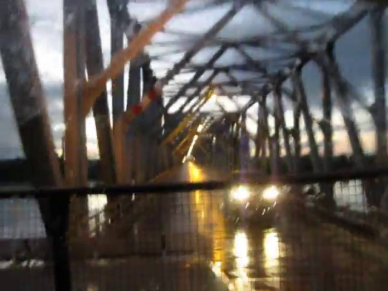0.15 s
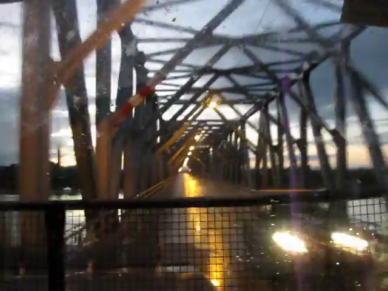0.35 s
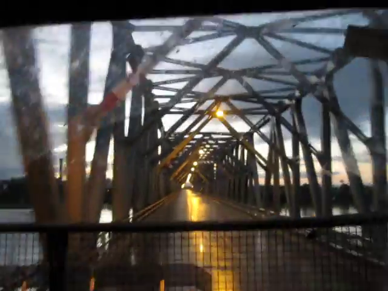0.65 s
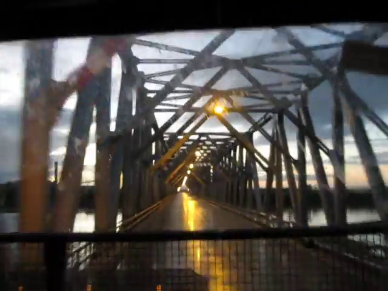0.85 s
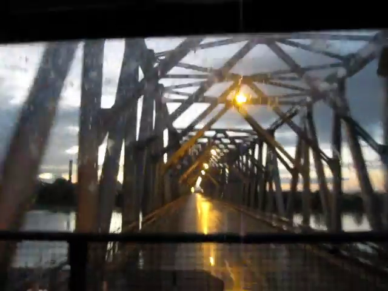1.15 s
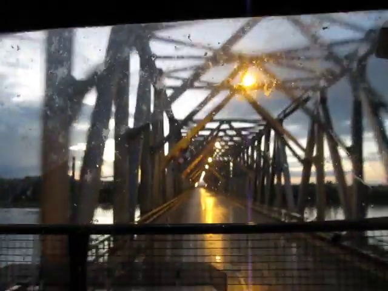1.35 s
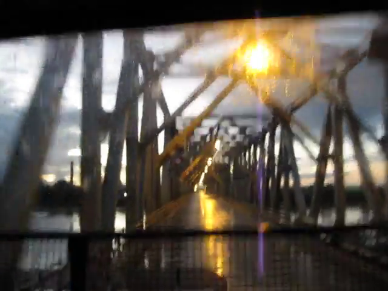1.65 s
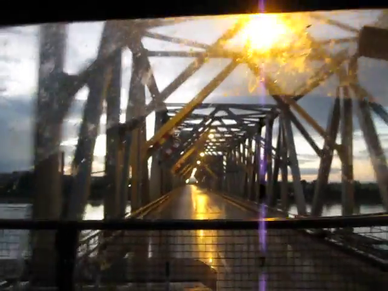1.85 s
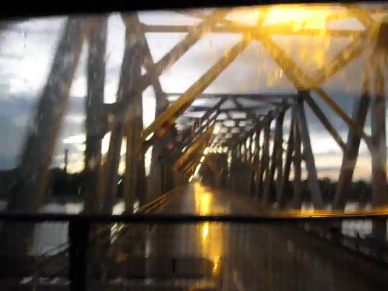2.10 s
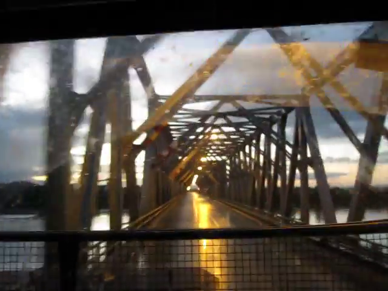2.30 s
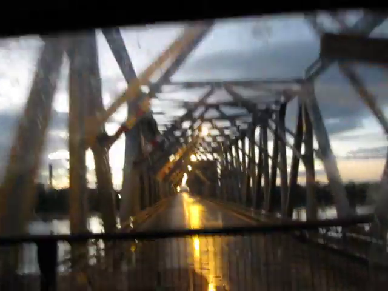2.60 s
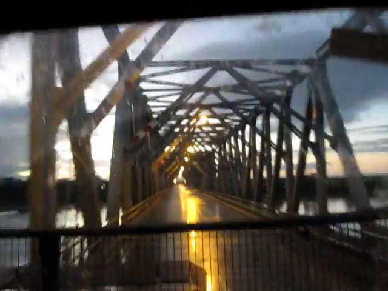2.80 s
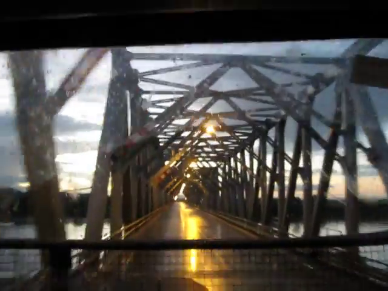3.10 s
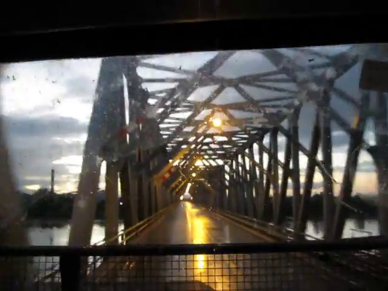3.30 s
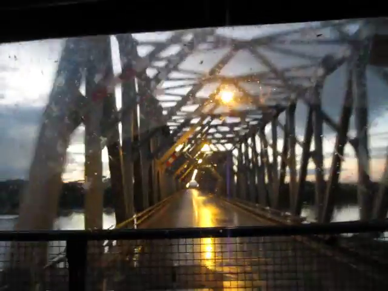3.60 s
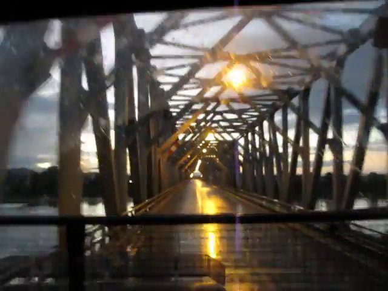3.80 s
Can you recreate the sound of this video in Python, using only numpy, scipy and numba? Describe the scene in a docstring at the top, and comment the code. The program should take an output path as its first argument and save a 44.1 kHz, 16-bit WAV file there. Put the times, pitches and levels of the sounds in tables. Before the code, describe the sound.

Steady diesel drone with clatter and a thin whine fills a moving truck cab. A wet car pass comes first, then a hard thud midway and denser rattles and squeaks near the end, captured inside with narrow bandwidth.

```python
"""The diesel drones and slowly gains speed, heard inside a truck cab driving along a wet road: sines at
multiples of the firing rate, with clatter and intake whistle as noise pulsed by each firing. The drivetrain
whines, bumps ring the panels as decaying sines, and the trim chirps with short gliding tones. An oncoming car
swishes by in gliding bands of noise; shaped noise makes the road rumble and the cab boom.
The recorder's limiter ducks around the hardest knocks."""
import sys
import numpy as np
from scipy import signal
from scipy.fft import rfft, irfft, next_fast_len
from scipy.io import wavfile
from scipy.ndimage import uniform_filter1d
from numba import njit

SR = 44100
rng = np.random.default_rng(int(sys.argv[2]) if len(sys.argv) > 2 else 0)


def wav_record(signal):
    """Record a signal, one row per channel, as 16-bit PCM in the file named by sys.argv[1]."""
    frames = np.transpose(np.atleast_2d(signal))
    bounded = np.clip(frames, -1, 1)
    # unit amplitude maps onto the largest positive 16-bit level
    quanta = np.round(bounded * 32767).astype(np.int16)
    wavfile.write(sys.argv[1], SR, quanta)


N = 174195

# spectrum of the loose fittings: (frequency [Hz], relative level per Hz [dB])
RATTLE_SPECTRUM = [(300, -9), (900, -1.5), (1300, -7), (2100, 3), (3000, -1), (4000, -0.5), (5200, -8.5),
                   (6500, -16)]


def undb(db):
    """Decibels to gain."""
    return 10 ** (np.asarray(db) / 20)


def unit(x):
    """Scale to rms 1."""
    return x / np.sqrt(np.mean(x ** 2) + 1e-20)


def clock():
    """Time of each sample, in seconds."""
    return np.arange(N) / SR


def curve(rows):
    """Join (time [s], value) rows by straight lines."""
    return np.interp(clock(), *np.array(rows, float).T)


def noise(gain):
    """Noise of rms 1 whose spectrum is gain(Hz)."""
    size = next_fast_len(N)
    hz = np.maximum(np.arange(size // 2 + 1) * SR / size, 1)
    spectrum = rfft(rng.standard_normal(size)) * gain(hz)
    return unit(irfft(spectrum, size)[:N])


def resonance(hz, width_hz):
    """Noise in a resonance; width_hz spans its half-amplitude points."""
    return noise(lambda f: 1 / (1 + ((f ** 2 - hz ** 2) / (f * width_hz)) ** 2))


def colour(points, f):
    """Gain at f of a (frequency [Hz], level [dB]) spectrum, joined over log frequency."""
    hz, db = np.array(points, float).T
    return undb(np.interp(np.log(f), np.log(hz), db))


def walk(rate):
    """Smooth random drift of rms 1, moving about rate times a second."""
    step = max(int(SR / rate), 1)
    held = np.repeat(rng.standard_normal(N // step + 2), step)
    held = held[rng.integers(step):][:N]
    return unit(uniform_filter1d(uniform_filter1d(held, step), step))


def steady(x, span_s):
    """Even out swells longer than span_s."""
    span = max(int(span_s * SR), 1)
    return x / np.sqrt(uniform_filter1d(x ** 2, span) + 1e-9)


def tone(hz):
    """Sine of rms 1 that follows a pitch curve from a random phase."""
    return np.sqrt(2) * np.sin(2 * np.pi * (np.cumsum(hz) / SR + rng.random()))


def engine():
    """One wandering firing rate drives the drone, the hum and everything that pulses at each firing."""
    # engine speed: (time [s], firing rate before jitter [Hz])
    firing_hz = [(0, 58.3), (1.0, 58.35), (1.8, 58.55), (2.4, 58.9), (3.1, 59.5), (3.95, 60.1)]
    speed_jitter = .0015
    hz = curve(firing_hz) * (1 + speed_jitter * walk(8))
    cycle = np.cumsum(hz) / SR % 1  # 0 to 1 from one firing to the next
    return drone(hz) + hum(hz) + clatter(cycle) + whistle(cycle)


def rough_order(multiple, hz):
    """A sine at a multiple of the firing rate, its level wavering and roughened."""
    waver_db, rough_db = 1.5, 1.5
    level = undb(waver_db * walk(9) + rough_db * walk(35))
    return steady(level * tone(multiple * hz), .3)


def drone(hz):
    """Engine orders sum to the drone; each shifts level as the throttle eases."""
    # multiples of the firing rate [ratio]; the lowest is a shaft that throbs against the firings
    multiples = [.82, 1, 3, 5, 9, 10, 11, 12, 14]
    # level of each multiple: (under load [dB], throttle eased [dB])
    multiple_levels = [(-35, -36), (-30.5, -31.5), (-32.5, -37.5), (-46.5, -38), (-41, -41.5), (-41, -40.5),
                       (-38.5, -35.5), (-40.5, -50), (-45.5, -45)]
    pull = load()
    total = 0
    for multiple, (loaded_db, eased_db) in zip(multiples, multiple_levels):
        level_db = eased_db + (loaded_db - eased_db) * pull
        total = total + undb(level_db) * rough_order(multiple, hz)
    return total


def load():
    """Engine load: 1 while pulling, 0 once the throttle has eased."""
    ease_s, ease_length_s = 1.85, 0.39  # middle and length of the easing
    return np.clip(.5 - (clock() - ease_s) / ease_length_s, 0, 1)


def hum(hz):
    """A driven accessory hums at its own fixed ratio to the firing rate."""
    # swells of the hum: (time [s], level [dB])
    hum_level = [(0, -39.5), (.25, -27), (.6, -40.5), (1.0, -27), (1.4, -33), (2.0, -30), (2.5, -29),
                 (2.7, -34), (3.95, -37)]
    return undb(curve(hum_level)) * rough_order(4.38, hz)


def clatter(cycle):
    """Each firing sets off resonant clatter and buzzing loose fittings, which decay until the next."""
    clatter_hz, clatter_width_hz, clatter_db = 1745, 460, -38.5
    ticking_db = -39.5
    gate = np.exp(-cycle / 0.53)  # decay in firing cycles
    knock = undb(clatter_db) * unit(gate * resonance(clatter_hz, clatter_width_hz))
    ticking = undb(ticking_db) * unit(gate * noise(lambda f: colour(RATTLE_SPECTRUM, f)))
    return knock + ticking


def whistle(cycle):
    """Thin intake whistle: a narrow band of noise pulsed at each firing."""
    # rise and fade of the whistle: (time [s], level [dB])
    whistle_level = [(0, -51), (.8, -48), (1.1, -45), (1.65, -46.5), (1.95, -57), (2.2, -71.5)]
    whistle_hz, width_hz = 5480, 200
    pulses = np.exp(-cycle / 0.64)  # decay in firing cycles
    return undb(curve(whistle_level)) * steady(pulses * resonance(whistle_hz, width_hz), .06)


def drivetrain():
    """The drivetrain whines as one sine, unsteady in pitch and level."""
    # whine: (time [s], pitch before jitter [Hz])
    whine_hz = [(0, 856), (1.8, 856), (2.5, 848), (3.0, 839), (3.5, 836), (3.95, 844)]
    whine_db, rough_db, pitch_jitter = -37.5, 3, .004
    pitch = curve(whine_hz) * (1 + pitch_jitter * walk(30))
    return undb(whine_db + rough_db * walk(22)) * tone(pitch)


def burst(age):
    """Pulse that rises to 1 at age 1, then dies away."""
    return age * np.exp(1 - age)


def bumps():
    """Each bump rings the panels, rebounds once, sets the body juddering and shakes loose fittings."""
    # bumps: (time [s], panel thud before mode levels [dB], rattle peak [dB], rattle length [s])
    bump_rows = [(0.779, -14.5, -37, .006), (0.93, -20, -30.5, .006), (1.216, -15.5, -38, .005),
                 (1.811, -12.5, -25, 0.0067), (1.914, -7, -46, .006), (1.929, -0.5, -19, 0.0081),
                 (2.381, -11.5, -36, .005), (2.527, -15, -43, .005), (2.566, -13, -24.5, 0.0053),
                 (2.682, -12.5, -42, .005), (2.919, -11.5, -43, 0.0054), (3.096, -15, -38, .008),
                 (3.247, -15, -26, .007), (3.553, -15.5, -36, .006), (3.586, -5.5, -19, 0.0054),
                 (3.642, -11.5, -48, .005), (3.683, -7, -21, 0.0044), (3.69, -11, -25.5, .007),
                 (3.782, -18, -24.5, 0.0067), (3.884, -14, -31, 0.014), (3.899, -14, -32, 0.016)]
    # panel modes: (frequency before detune [Hz], level before scatter [dB], 60 dB decay time [s])
    panel_modes = [(286, -4, .055), (342, -2, 0.042), (433, -2.5, 0.044), (548, -9, 0.04),
                   (790, -15.5, 0.05)]
    scatter_db, detune = 1.5, 0.033  # each blow lands on another spot
    rebound_s, rebound_db = 0.0056, -6
    judder_hz, judder_width_hz, judder_peak_s, judder_db = 370, 260, .007, -22  # level relative to thud
    thuds, shaken, judder = np.zeros((3, N))
    mode_hz, mode_db, t60 = np.array(panel_modes).T[:, :, None]
    sign = (-1) ** np.arange(len(panel_modes))[:, None]  # neighbouring modes swing opposite ways
    spots = rng.standard_normal((len(bump_rows), 2, len(panel_modes), 1))
    for (at, thud_db, rattle_db, length), (louder, sharper) in zip(bump_rows, spots):
        near = (clock() >= at) & (clock() < at + .1)
        age = clock()[near] - at
        gain = sign * undb(mode_db + scatter_db * louder)
        pitch = mode_hz * (1 + detune * sharper)

        def ring(s):
            """Sum of the decaying panel modes."""
            decay = np.exp(-np.log(1000) * s / t60)
            return np.sum(gain * np.sin(2 * np.pi * pitch * s) * decay, axis=0)

        rebound = undb(rebound_db) * ring(np.maximum(age - rebound_s, 0))
        thuds[near] += undb(thud_db) * (ring(age) + rebound)
        judder[near] += undb(thud_db + judder_db) * burst(age / judder_peak_s)
        shaken[near] += undb(rattle_db) * burst(age / (length / 2))
    body = judder * resonance(judder_hz, judder_width_hz)
    rattle = shaken * noise(lambda f: colour(RATTLE_SPECTRUM, f))
    return thuds + body + rattle


def chirps():
    """Rubbing trim sings and scrapes for a few milliseconds; the cab returns a faint echo."""
    # chirps: (loudest at [s], pitch there before slip [Hz], level [dB], length [s], glide [octaves/s])
    chirp_rows = [(1.544, 2926, -33, 0.0088, -10), (1.552, 2900, -27, .012, -1),
                  (1.641, 3170, -28.5, 0.01, -4), (1.65, 3200, -30, .008, 0),
                  (2.527, 3350, -27.5, 0.01, -6), (2.541, 3390, -31, .010, -4),
                  (3.196, 1480, -33, .016, -19), (3.245, 2290, -27.5, .011, -17.5),
                  (3.259, 1817, -30, 0.013, -21.5), (3.417, 2924, -21.5, .010, 4),
                  (3.434, 2980, -42, .010, 0.5), (3.525, 3200, -27, 0.011, -2.5),
                  (3.667, 2980, -27.5, 0.0083, 2), (3.777, 2960, -18.5, 0.0088, -6),
                  (3.906, 2050, -27, 0.0079, 5)]
    pitch_rough, octave_db = 0.017, -22
    hiss_hz, hiss_width_hz, hiss_db = 5430, 900, -16.5
    echo_s, echo_db = .012, -21.5
    trim = np.zeros(N)
    hiss = undb(hiss_db) * resonance(hiss_hz, hiss_width_hz)
    slip = 1 + pitch_rough * walk(600)
    for at, hz, db, length, glide in chirp_rows:
        near = np.abs(clock() - at) < length
        age = clock()[near] - at
        phase = 2 * np.pi * np.cumsum(hz * 2 ** (glide * age) * slip[near]) / SR
        swell = np.exp(-(2 * age / length) ** 2)
        voice = np.sin(phase) + undb(octave_db) * np.sin(2 * phase) + hiss[near]
        trim[near] += np.sqrt(2) * undb(db) * swell * voice
    return trim + undb(echo_db) * np.roll(trim, int(echo_s * SR))


def pass_by(at, half):
    """Swell that peaks at 1 and falls to half, half seconds either side."""
    return 1 / (1 + ((clock() - at) / half) ** 2)


def oncoming_car():
    """Wet tyres swish with a gliding pitch while fluttering spray swells and fades as the car goes by."""
    # swishes: (loudest at [s], half length [s], centre there [Hz], width [Hz], level [dB], glide [octaves/s])
    swishes = [(0.432, 0.035, 1680, 230, -24, 0.95), (0.551, .09, 430, 110, -25, -.5),
               (.53, .08, 1200, 1000, -28, -.5), (.628, 0.042, 1370, 380, -23.5, -1.6)]
    # spray: (frequency [Hz], relative level per Hz [dB])
    spray_spectrum = [(300, -22), (1000, -1.5), (2400, 0.5), (3700, -2), (5200, -6), (5800, -14.5),
                      (6500, -14.5)]
    spray_s, spray_half_s, spray_db, flutter_db = .62, 0.18, -26, 1.5
    tyres = 0
    for at, half, hz, width, db, glide in swishes:
        pitch = hz * 2 ** (glide * np.clip(clock() - at, -2 * half, 2 * half))
        # slow noise times a sine puts a band of noise around the gliding pitch
        band = noise(lambda f: 1 / (1 + (2 * f / width) ** 2)) * tone(pitch)
        tyres = tyres + undb(db) * steady(band, .04) * pass_by(at, half)
    spray = undb(spray_db + flutter_db * walk(70)) * noise(lambda f: colour(spray_spectrum, f))
    return tyres + spray * pass_by(spray_s, spray_half_s)


def cab():
    """The body shakes, the enclosed air booms and a few narrow resonances ring on."""
    # body shake: (time [s], level before trim [dB])
    shake_level = [(0, -26), (0.17, -25), (0.45, -31), (0.7, -32), (0.95, -28), (1.3, -23.5), (1.8, -26.5),
                   (2.0, -27), (2.33, -30), (2.6, -30.5), (3.0, -30), (3.38, -21.5), (3.65, -28),
                   (3.95, -35)]
    # air boom: (time [s], level before trim [dB])
    boom_level = [(0, -29.5), (0.52, -27), (0.7, -28.5), (0.86, -22.5), (1.05, -29), (1.28, -22.5),
                  (1.58, -27.5), (1.72, -21.5), (1.9, -20), (2.18, -30.5), (2.31, -23.5), (2.43, -25.5),
                  (2.55, -27), (2.74, -30), (2.99, -19), (3.08, -26.5), (3.7, -26), (3.8, -21.5)]
    # narrow bands of noise that ring on throughout: (frequency [Hz], width [Hz], level [dB])
    cab_rings = [(23.15, 2.4, -36), (138, 40, -33), (285, 56, -41), (524, 29, -47.5), (846.6, 34, -39)]
    shake_hz, shake_width_hz, shake_trim_db = 39, 28, -1.5
    boom_hz, boom_width_hz, boom_trim_db = 103.3, 31.4, 0.5
    shake = undb(curve(shake_level) + shake_trim_db) * steady(resonance(shake_hz, shake_width_hz), 0.13)
    boom = undb(curve(boom_level) + boom_trim_db) * steady(resonance(boom_hz, boom_width_hz), 0.1)
    rings = sum(undb(db) * steady(resonance(hz, width), 0.37) for hz, width, db in cab_rings)
    return shake + boom + rings


def road():
    """Octave bands of tyre noise through the body swell and shudder together and flicker alone."""
    # road noise: (frequency [Hz], relative level per Hz before the low cut [dB])
    road_spectrum = [(76, -32.5), (130, -0.5), (196, -6), (263, -3), (389, -10), (531, -4), (606, -10),
                     (636, -8), (749, -10), (854, -8.5), (958, -11), (1200, -16.5), (1750, -15),
                     (2320, -24.5), (4530, -26.5), (6500, -41), (8450, -72.5), (14300, -120)]
    road_db, low_cut_hz = -21.5, 139
    swell_db, shake_db, flicker_db = .5, 1, 1.02
    rest = noise(lambda f: colour(road_spectrum, f) / np.sqrt(1 + (low_cut_hz / f) ** 8))
    bands = 0
    for edge_hz in (280, 560, 1120, 2240, 4480):
        low_pass = signal.butter(4, edge_hz, fs=SR, output="sos")
        band = signal.sosfiltfilt(low_pass, rest)
        bands = bands + band * undb(flicker_db * walk(28.01))
        rest = rest - band  # what lies above this edge
    shared_db = swell_db * walk(2.8) + shake_db * walk(35)
    return undb(road_db + shared_db) * (bands + rest)


def wet_stretch():
    """The truck's own tyres hiss on a wetter stretch: a band of noise that swells and fades."""
    loudest_s, half_length_s = 2.5, .45
    hiss_hz, width_hz, hiss_db = 4900, 1300, -44.5
    swell = np.exp(-((clock() - loudest_s) / half_length_s) ** 2)
    return undb(hiss_db) * swell * resonance(hiss_hz, width_hz)


def lull(x):
    """The low rumble dips briefly as the car goes by."""
    lull_s, half_length_s, dip_db, below_hz = .705, 0.098, -7, 400
    low = signal.sosfiltfilt(signal.butter(2, below_hz, fs=SR, output="sos"), x)
    dip = undb(dip_db * np.exp(-((clock() - lull_s) / half_length_s) ** 2))
    return x + low * (dip - 1)


def scene():
    """Everything heard from the seat, as one channel."""
    truck = engine() + drivetrain() + cab() + road() + wet_stretch()
    return (bumps() + chirps() + oncoming_car() + lull(truck))[None]


@njit
def duck(over, attack, hold, release):
    """Gain reduction in dB: rises fast with the excess level, holds, then lets go steadily."""
    out, cut, wait = np.zeros(len(over)), 0., 0.
    for i in range(len(over)):
        if over[i] > cut:
            cut += (over[i] - cut) * attack
            wait = hold
        elif wait > 0:
            wait -= 1
        else:
            cut = max(cut - release, 0.)
        out[i] = cut
    return out


def record(dry):
    """A fast look-ahead limiter with a slow recovery, then the recorder's narrow band."""
    limit_db, look_ahead_s, top_hz = -10, 0.0022, 6300
    attack_s, hold_s, release_db_per_s = 0.00076, 0.036, 48
    over_db = 20 * np.log10(np.abs(dry[0]) + 1e-9) - limit_db
    attack = 1 - np.exp(-1 / (attack_s * SR))  # share of the excess caught per sample
    cut_db = duck(over_db, attack, float(hold_s * SR), release_db_per_s / SR)
    early_cut_db = np.interp(clock() + look_ahead_s, clock(), cut_db)
    limited = dry * undb(-early_cut_db)
    low_pass = signal.firwin(141, top_hz, window=("kaiser", 9), fs=SR)
    return signal.fftconvolve(limited, low_pass[None], mode="same")


dry = scene()
out = record(dry)
wav_record(out)
```